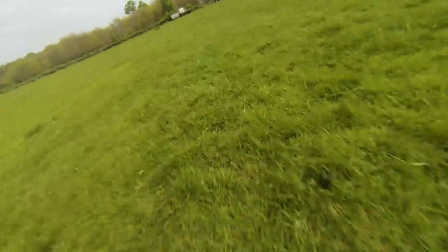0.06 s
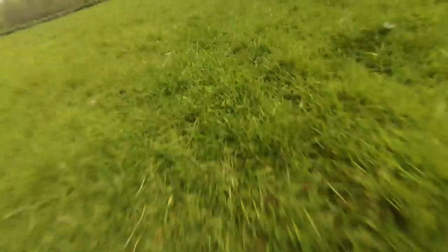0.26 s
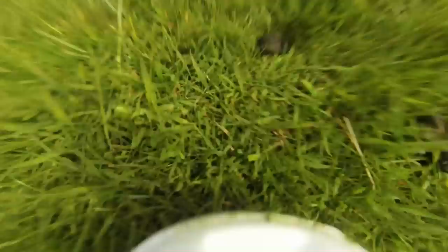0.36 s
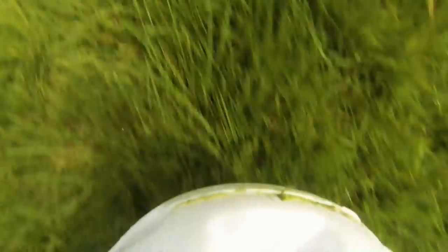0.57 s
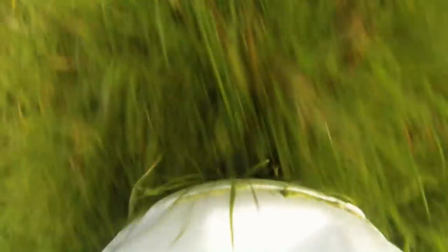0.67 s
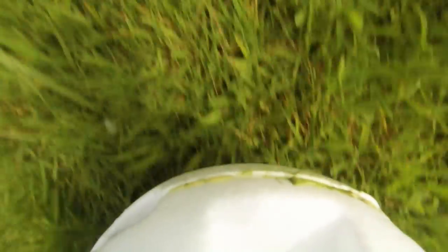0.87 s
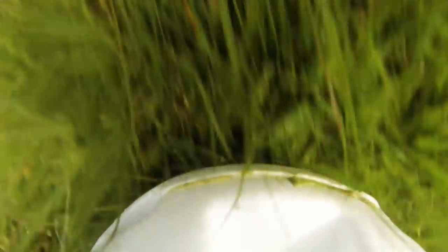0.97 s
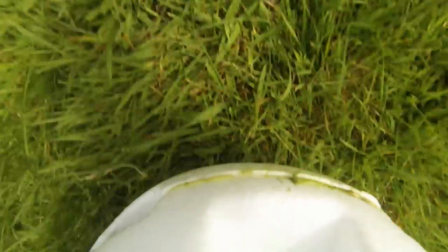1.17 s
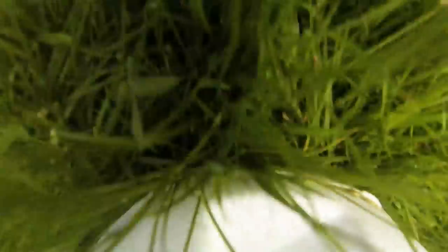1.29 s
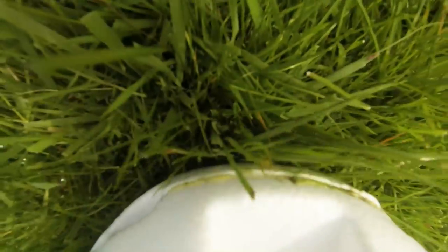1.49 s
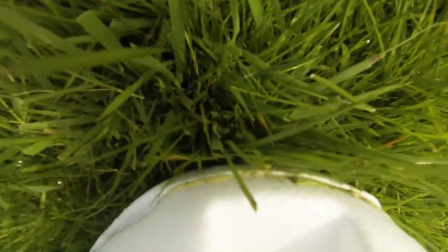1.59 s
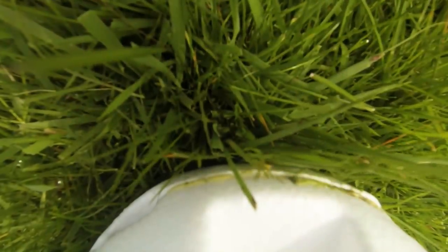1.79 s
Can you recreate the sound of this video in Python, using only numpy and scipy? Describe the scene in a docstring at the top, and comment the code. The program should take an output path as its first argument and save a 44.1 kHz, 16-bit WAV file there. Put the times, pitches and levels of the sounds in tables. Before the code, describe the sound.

Grass scraping and thumps as a small model aircraft belly-lands and slides to a stop.

```python
"""Grass scrapes and wind buffets, swelling into thumps: a small foam aircraft belly-lands, heard on board.
Blades rub and squeak on the hull amid short knocks and ticks; tussocks shove the airframe and ring it.
Rough ground keeps the body shuddering. The slide dies away while the wings still flap,
over faint microphone hiss."""
import sys
import numpy as np
from scipy import signal
from scipy.fft import rfft, irfft
from scipy.io import wavfile

SR = 44100
rng = np.random.default_rng(int(sys.argv[2]) if len(sys.argv) > 2 else 0)


def dump(signal):
    """Clip the signal to [-1, 1] and save it as 16-bit WAV at the path in sys.argv[1]."""
    limited = np.clip(np.atleast_2d(signal).T, -1, 1)
    pcm = np.round(limited * 32767).astype(np.int16)
    wavfile.write(sys.argv[1], SR, pcm)


N = 81585
T = np.arange(N) / SR


def amp(db):
    """dB to gain."""
    return 10 ** (np.asarray(db) / 20)


def unit(x):
    """Scale to rms 1."""
    return x / np.sqrt(np.mean(x ** 2) + 1e-20)


def curve(rows, column=1):
    """Table column, linearly interpolated over time."""
    rows = np.array(rows)
    return np.interp(T, rows[:, 0], rows[:, column])


def add(mix, start_s, sound):
    """Mix a sound in at start_s."""
    part = mix[max(round(start_s * SR), 0):][:len(sound)]
    part += sound[:len(part)]


def colour(x, spectrum):
    """Minimum-phase filter from rows of f/Hz, gain/dB."""
    hz, db = np.transpose(spectrum)
    size = 8192
    bins_hz = abs(np.fft.fftfreq(size, 1 / SR))
    log_gain = np.log(amp(np.interp(np.log(bins_hz + 1), np.log(hz + 1), db)))
    response = np.exp(np.conj(signal.hilbert(log_gain)))
    taps = np.fft.ifft(response).real[:size // 2]
    return signal.fftconvolve(x, taps)[:len(x)]


def below(x, hz):
    """Zero-phase low-pass."""
    return signal.sosfiltfilt(signal.butter(4, hz, fs=SR, output="sos"), x)


def drift(hz):
    """Noise below hz, rms 1."""
    passband = np.fft.rfftfreq(N, 1 / SR) < hz
    return unit(irfft(rfft(rng.standard_normal(N)) * passband, N))


def impacts(per_s, spread_db):
    """Random impulses of uneven size, rms 1."""
    size = amp(spread_db * np.minimum(rng.exponential(1, N), 4))
    return unit(size * rng.choice([-1, 1], N) * (rng.random(N) < per_s / SR))


def push(contact_s):
    """Gaussian pulse, centred contact_s after its start."""
    t = np.arange(0, 2 * contact_s, 1 / SR) - contact_s
    return np.exp(-(np.pi * t / contact_s) ** 2)


def airframe(force):
    """The hollow body rings in its low modes."""
    # body modes: f/Hz, level/dB, t60/s
    modes = [(74, -12, 0.3), (131.5, -4.5, 0.099), (161.8, -8, 0.094), (221, -6, 0.1), (256, -7, 0.098),
             (273.4, -4.5, 0.1), (306.3, -6, 0.062), (404, -4.5, 0.0055), (618.4, -4, 0.058)]
    t = T[:SR // 2]
    ring = sum(amp(db - 60 * t / t60_s) * np.sin(2 * np.pi * hz * t) for hz, db, t60_s in modes)
    return signal.fftconvolve(force, ring)[:N]


def hull(force):
    """The foam skin colours each contact and rings faintly in narrow modes."""
    # skin response: f/Hz, gain/dB
    skin_spectrum = [(470, -41), (800, -18.5), (984, -6), (1240, -1.5), (1640, 0.5), (1730, -6), (1880, -9),
                     (2000, -19), (2120, -11.5), (2340, -11.5), (2810, -16.5), (3330, -22.5), (3910, -23),
                     (4310, -38.5), (5240, -28.5), (5920, -39), (7190, -39.5), (7930, -48), (11900, -49.5),
                     (13400, -55.5), (14800, -63)]
    # duller hollow beneath: f/Hz, gain/dB
    hollow_spectrum = [(150, -17), (400, -9), (620, -13.5), (850, -21.5), (2000, -75)]
    # skin resonances: f/Hz, bandwidth/Hz, gain/dB
    resonances = [(1444, 16, -4), (1980, 22, -1.5), (2270, 21, -6.5), (2790, 22, -8), (3790, 48, -6.5),
                  (5280, 180, -3), (6700, 200, -8.5)]
    skin = colour(force, skin_spectrum) + colour(force, hollow_spectrum)
    rings = sum(amp(db) * signal.lfilter(*signal.iirpeak(hz, hz / width_hz, fs=SR), skin)
                for hz, width_hz, db in resonances)
    return skin + rings


def tussock_bumps():
    """Tussocks shove the body up or drag it down; short blows also ring its modes."""
    # blows: t/s, peak push (+ up, - down), contact/s
    blows = [(.222, -0.25, .0036), (0.251, 0.77, 0.0047), (0.259, -0.57, 0.0046), (.2655, 0.99, 0.0045),
             (0.272, -0.46, 0.0075), (0.282, 0.68, 0.0075), (0.312, 0.85, 0.0065), (0.3201, -0.67, 0.0095),
             (0.335, 0.52, .013), (0.347, -.4, 0.0083), (0.3894, 0.654, 0.0044), (0.3946, 0.99, .004),
             (.3995, -1.06, 0.0046), (.41, 0.85, 0.0076), (0.497, 0.81, 0.0039), (0.58, 0.35, 0.0051),
             (0.643, 0.71, 0.009), (0.655, -0.28, 0.013), (0.673, 0.54, 0.014), (.731, 0.7, .006),
             (0.7443, 0.57, .003), (.749, -0.59, 0.0043), (0.773, 0.89, 0.011), (0.8737, 0.29, .0025),
             (0.9048, 0.38, 0.0027), (0.914, 0.61, 0.0035), (0.9506, -1.2, 0.0027), (1.033, -0.25, 0.0026),
             (1.04, -0.26, 0.0039), (1.103, -0.41, 0.018), (1.2478, -0.36, 0.0035), (1.2515, 0.84, 0.0062),
             (1.2658, 0.52, 0.0058)]
    ring_db = -7
    shove, force = np.zeros(N), np.zeros(N)
    for centre_s, peak, contact_s in blows:
        pulse = push(contact_s)
        add(shove, centre_s - contact_s, peak * pulse)
        add(force, centre_s - contact_s, peak * pulse / pulse.sum())
    return shove - amp(ring_db) * airframe(force)


def grass_scrape():
    """Blades flick and rub the hull, swelling and shifting in brightness; a few crackle."""
    # grass on the hull: t/s, level/dB, upper mids/dB re low band, treble/dB re low band
    levels = [(.02, -45.5, -13, -34), (.068, -47, -3, -28), (.078, -42, -9.5, -28), (.11, -36.5, -11, -20),
              (.16, -35.5, -13, -27.5), (.214, -32, -7.5, -19.5), (.224, -25.5, -11.5, -19),
              (.27, -28.5, -12, -19.5), (.35, -22, -15.5, -26), (.376, -19, -3, -26.5),
              (.399, -22, -3.5, -22.5), (.406, -28, -15.5, -26), (.44, -40.5, -12, -29),
              (.475, -53.5, -9, -33), (.488, -40, -20, -39), (0.555, -40.5, -10, -36.5),
              (0.583, -38, -12, -47), (0.601, -44.5, -10, -43), (0.659, -40.5, -6, -29),
              (.71, -32, -7.5, -33), (.735, -24, -10.5, -27.5), (0.767, -25, -8.5, -31.5),
              (0.777, -35.5, -10, -26), (0.785, -41.5, -8, -30), (.838, -36.5, -11, -31),
              (0.844, -30, -7, -33), (0.879, -34, -14.5, -32), (0.991, -37, -12.5, -38),
              (1.041, -29, -14, -32), (1.059, -29.5, -6.5, -27), (1.088, -30, -5, -22.5),
              (1.1, -34, -7, -28), (1.23, -37.5, -11.5, -34), (1.333, -33.5, -7, -29), (1.387, -37, 3, -18),
              (1.41, -38.5, -0.5, -24.5), (1.46, -39, -7.5, -32.5), (1.52, -49.5, -16, -39.5),
              (1.85, -69, -6, -23)]
    mid_hz, treble_hz = 1863, 4050
    gain_db, flutter_db, crackle_db = -1, 2, -12
    flicks = impacts(per_s=3500, spread_db=0.5)
    rub = 0.85 * rng.standard_normal(N)
    skin = hull((flicks + rub) * amp(flutter_db * drift(hz=112.5)))
    low, low_and_mid = below(skin, mid_hz), below(skin, treble_hz)
    mids = unit(low_and_mid - low)
    crackle = np.diff(hull(impacts(per_s=200, spread_db=7.5)), prepend=0)
    crackle = unit(crackle - below(crackle, treble_hz))
    treble = unit(unit(skin - low_and_mid) + amp(crackle_db) * crackle)
    bands = unit(low) + amp(curve(levels, column=2)) * mids + amp(curve(levels, column=3)) * treble
    return amp(gain_db + curve(levels)) * bands


def wind_buffet():
    """Low, lumpy buffeting at the microphone; fades as the aircraft slows."""
    # buffet envelope: t/s, level/dB
    levels = [(0, -36.5), (.2, -29.5), (.28, -15.5), (.4, -15), (.5, -22.5), (.6, -37), (.68, -28.5),
              (.78, -18.5), (1.04, -24.5), (1.2, -47), (1.3, -35.5), (1.45, -37), (1.85, -61)]
    # turbulence spectrum: f/Hz, density/dB
    spectrum = [(12, -31.5), (25, 0), (40, -0.5), (70, -9.5), (110, -27.5), (250, -42), (800, -86)]
    gusts = below(colour(rng.standard_normal(N + SR), spectrum), hz=700)
    return amp(curve(levels)) * unit(gusts[SR:])


def ground_shudder():
    """Small jolts rumble the airframe: soft in the grass tips, harder once the belly bears the weight."""
    # rumble envelope: t/s, level/dB
    levels = [(0, -50), (.08, -34), (.2, -32.5), (.255, -14), (.36, -27), (.4, -19.5), (.45, -36),
              (.52, -37.5), (.59, -27), (.69, -41.5), (.745, -25.5), (.8, -39), (.92, -19.5), (1.01, -33),
              (1.05, -26.5), (1.2, -49), (1.27, -19.5), (1.35, -48), (1.5, -42.5), (1.85, -63.5)]
    grounded_s, settle_s = 0.45, 0.14
    body = airframe(impacts(per_s=810, spread_db=4.5))
    soft = unit(signal.fftconvolve(body - below(body, hz=155), push(contact_s=0.003), "same"))
    hard = unit(signal.fftconvolve(body - below(body, hz=94), push(contact_s=0.0017), "same"))
    load = np.clip((T - grounded_s) / settle_s + 0.5, 0, 1)
    return amp(curve(levels)) * ((1 - load) * soft + load * hard)


def knocks_and_ticks():
    """Short knocks and dry ticks on the hull, including an overload click on the hardest thump."""
    # bursts: t/s, knock drive/dB, tick drive/dB
    bursts = [(.072, -15, -43), (.167, -25, -31), (0.223, -10, -40), (.374, -10, -40), (.387, -12.5, -32),
              (.3985, -12, -21), (.41, -18.5, -28), (0.43, -23, -26), (.465, -43, -46), (.504, -29, -36.5),
              (.647, -34, -37), (.4945, -8.5, -28.5), (0.4974, -12, -31.5), (0.5326, -7, -40),
              (0.581, -29, -39), (0.654, -26, -34), (.666, -25.5, -34), (.773, -16, -22),
              (.843, -13.5, -45), (0.95, -27, -26), (1.028, -8, -44), (1.0528, -23, -25), (1.061, -17, -25),
              (1.245, -6.5, -56.5), (1.314, 0, -20.5), (1.33, -24.5, -33), (1.336, -15, -30),
              (1.555, -24.5, -71)]
    # tick colour: f/Hz, gain/dB
    tick_spectrum = [(1500, -29.5), (4600, -6.5), (8000, -21.5), (12500, -27), (15000, -32)]
    decay_s = 0.0013
    t = T[:SR // 20]
    knock, tick = np.zeros(N), np.zeros(N)
    for start_s, knock_db, tick_db in bursts:
        burst = np.exp(-t / decay_s) * rng.standard_normal(len(t))
        add(knock, start_s, amp(knock_db) * burst)
        add(tick, start_s, amp(tick_db) * burst)
    return below(hull(knock), hz=3620) + colour(tick, tick_spectrum)


def blade_squeaks():
    """A blade briefly sticks and slips on the foam, falling in pitch."""
    # squeaks: t/s, peak/dB, f/Hz, length/s, fall over that length/Hz
    squeaks = [(0.257, -18, 1272, 0.034, 30), (0.302, -20, 1223, 0.01, 36),
               (0.377, -8.5, 1672, 0.0063, 100), (0.5373, -14, 1601, 0.0042, 136),
               (0.54, -18, 1323, 0.0087, 180), (0.58, -32, 1327, 0.025, 40),
               (0.846, -25, 1498, 0.0141, 180), (1.389, -27.5, 1205, 0.036, 134),
               (1.388, -28.5, 2340, 0.013, 60), (1.44, -41.5, 2330, 0.05, 18)]
    jitter_hz, overtone_db = 53, -31
    sound = np.zeros(N)
    for centre_s, db, hz, length_s, fall_hz in squeaks:
        progress = np.clip((T - centre_s) / length_s, -2, 2)
        pitch_hz = hz + jitter_hz * drift(hz=406) - fall_hz * progress
        phase = 2 * np.pi * np.cumsum(pitch_hz) / SR
        envelope = amp(db) * np.exp(-(2 * progress) ** 2)
        sound += envelope * (np.sin(phase) + amp(overtone_db) * np.sin(2 * phase))
    return sound


def wing_flap():
    """The wings swing on after the nose digs in."""
    # swing envelope: t/s, level/dB
    levels = [(1.09, -10), (1.21, -25), (1.568, -23.5), (1.85, -47.5)]
    start_s, flap_hz = levels[0][0], 19.4
    rate_hz = flap_hz * (1 + 0.038 * drift(hz=10))
    swing = np.sin(2 * np.pi * np.cumsum(rate_hz) / SR)
    onset = np.clip((T - start_s) * flap_hz, 0, 1)  # one-cycle ramp
    return amp(curve(levels)) * unit(swing) * onset


def microphone_hiss():
    """Faint, steady self-noise."""
    # noise spectrum: f/Hz, density/dB
    spectrum = [(100, 0), (1500, -9.5), (4000, -22.5), (15000, -32)]
    return amp(db=-68) * unit(colour(rng.standard_normal(N), spectrum))


def scene():
    """Sum at one microphone on the airframe."""
    mix = tussock_bumps() + grass_scrape() + wind_buffet() + ground_shudder()
    mix += knocks_and_ticks() + blade_squeaks() + wing_flap() + microphone_hiss()
    return mix[None]


def record(dry):
    """Low cut, clipping of the hardest blows, band limit."""
    low_cut_hz, top_hz = 10.2, 14400
    cut = signal.sosfilt(signal.butter(1, low_cut_hz, "high", fs=SR, output="sos"), dry)
    band_limit = signal.firwin(255, top_hz, window=("kaiser", 9), fs=SR)
    return signal.oaconvolve(np.clip(cut, -1, 1), band_limit[None], "same")


dry = scene()
out = record(dry)
dump(out)
```